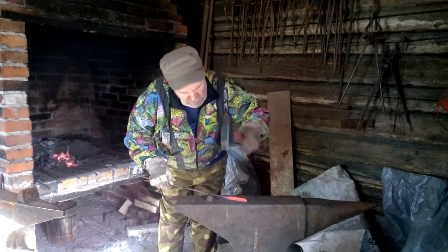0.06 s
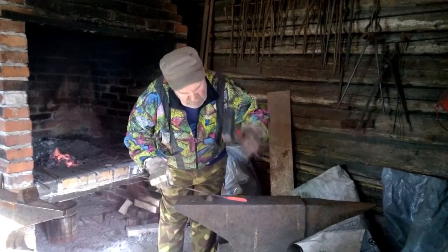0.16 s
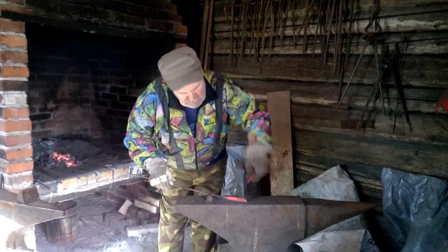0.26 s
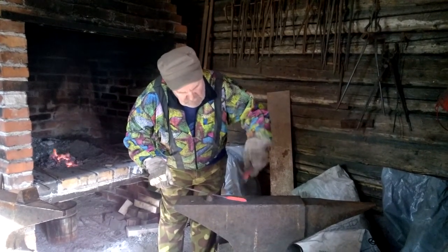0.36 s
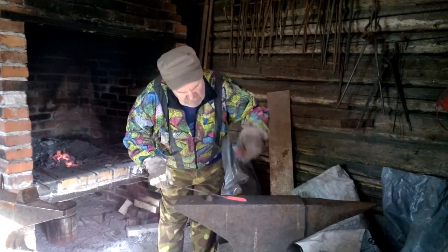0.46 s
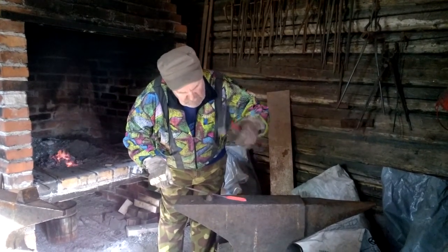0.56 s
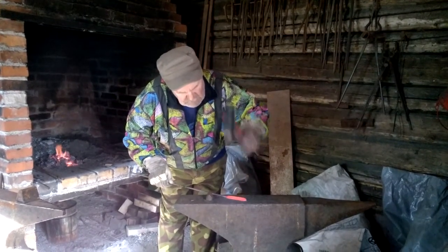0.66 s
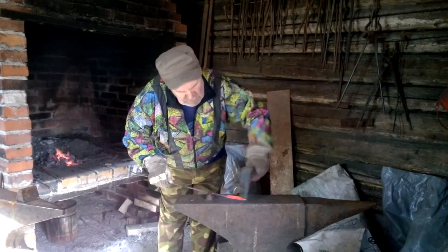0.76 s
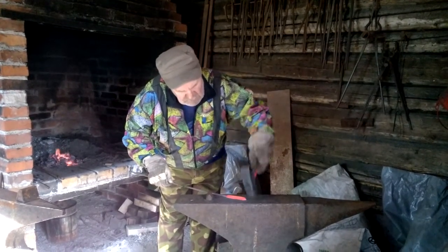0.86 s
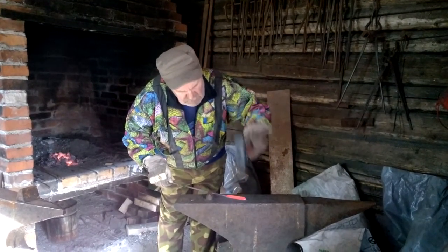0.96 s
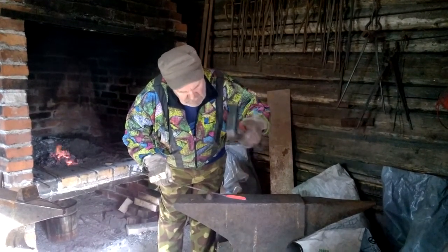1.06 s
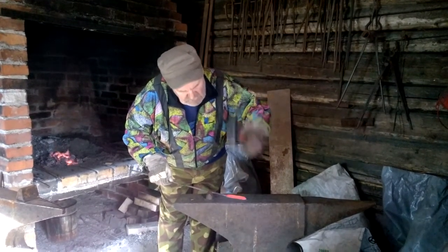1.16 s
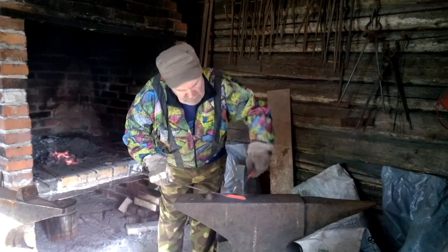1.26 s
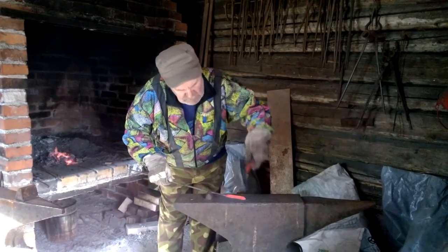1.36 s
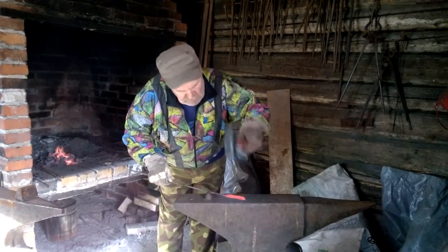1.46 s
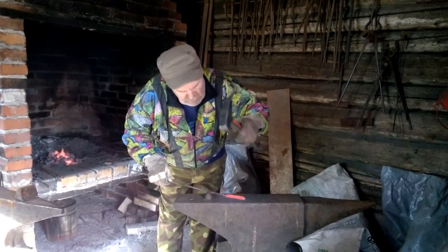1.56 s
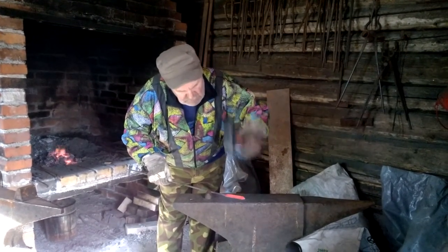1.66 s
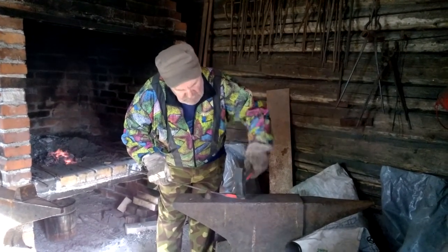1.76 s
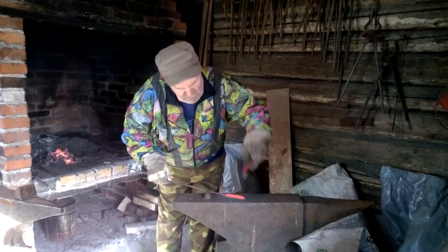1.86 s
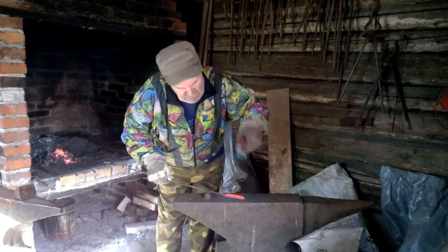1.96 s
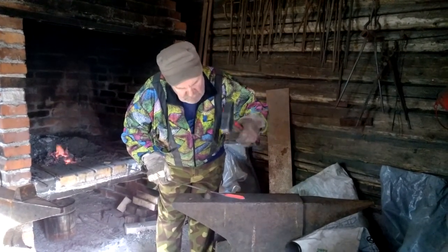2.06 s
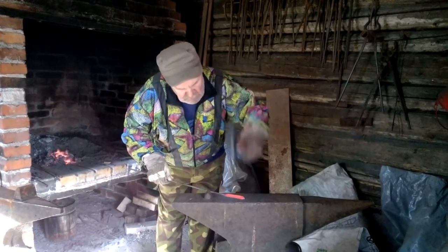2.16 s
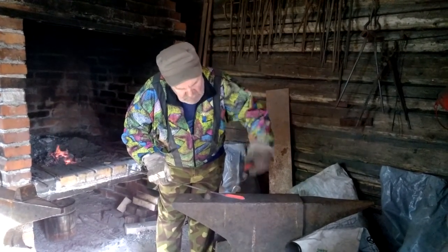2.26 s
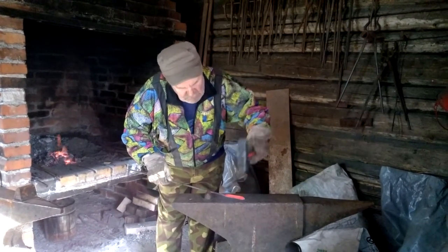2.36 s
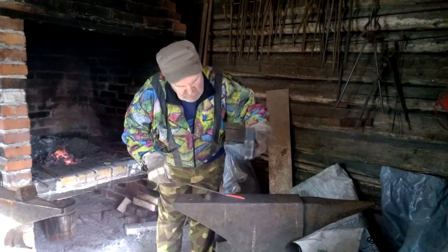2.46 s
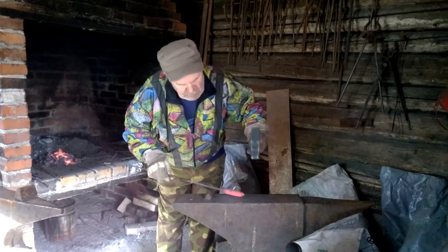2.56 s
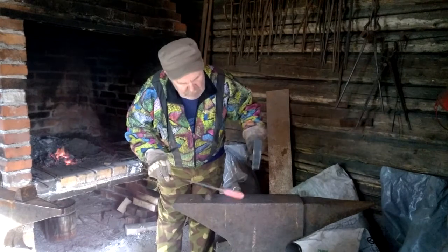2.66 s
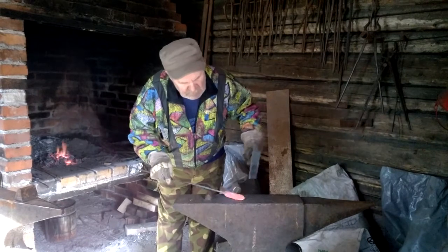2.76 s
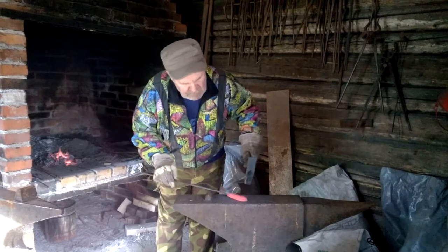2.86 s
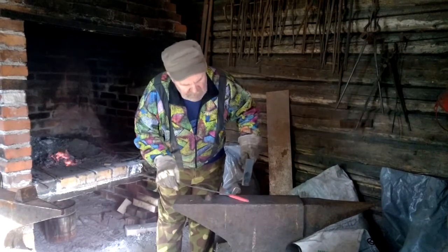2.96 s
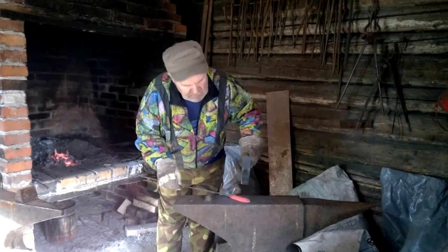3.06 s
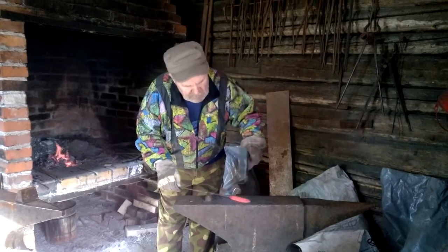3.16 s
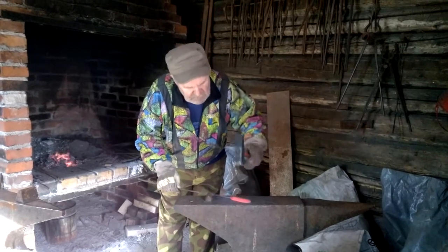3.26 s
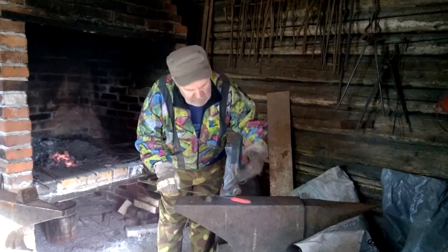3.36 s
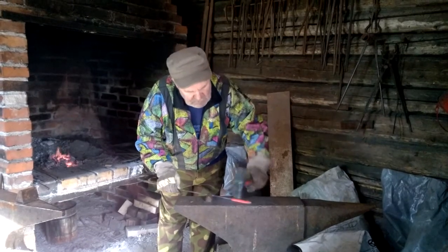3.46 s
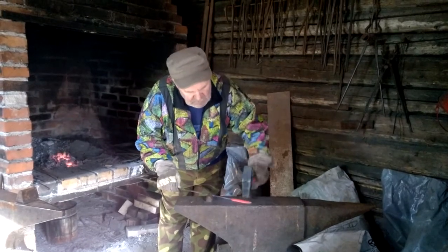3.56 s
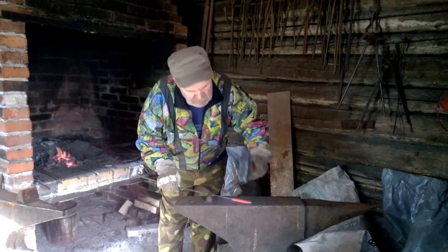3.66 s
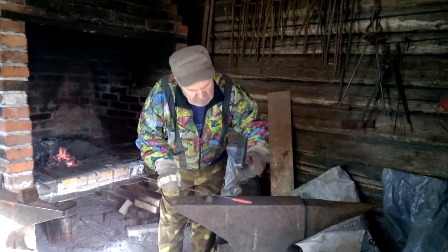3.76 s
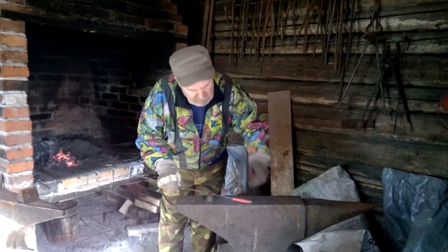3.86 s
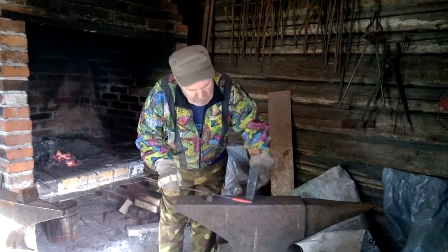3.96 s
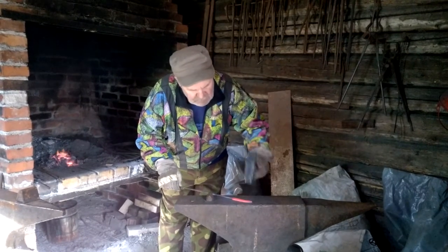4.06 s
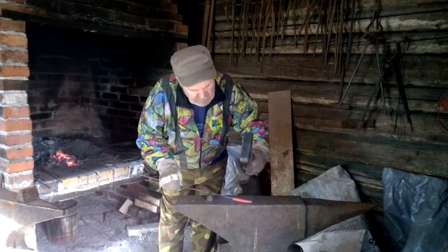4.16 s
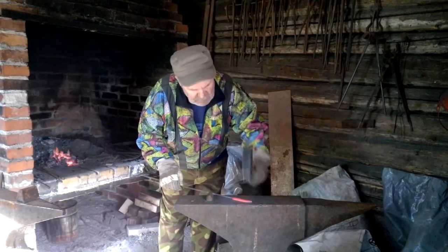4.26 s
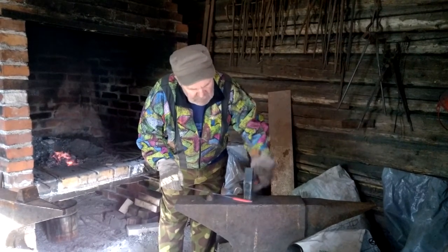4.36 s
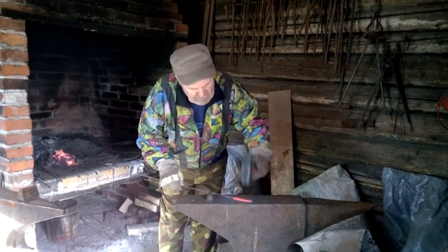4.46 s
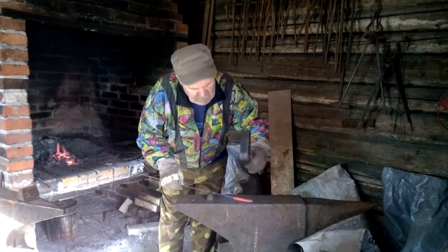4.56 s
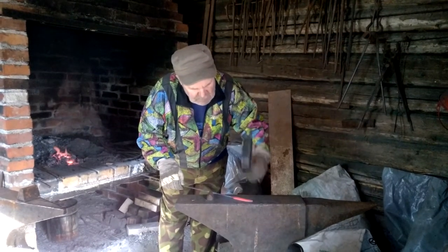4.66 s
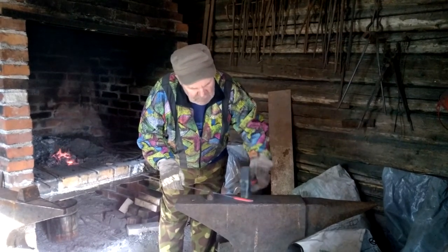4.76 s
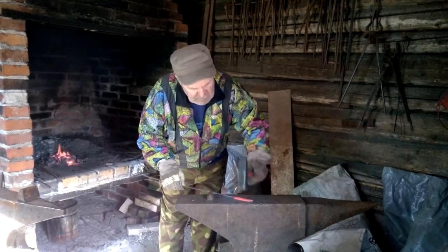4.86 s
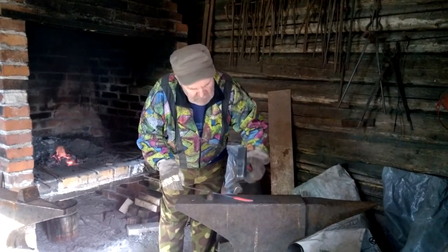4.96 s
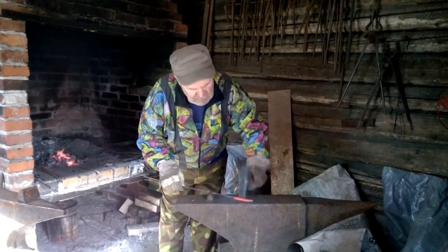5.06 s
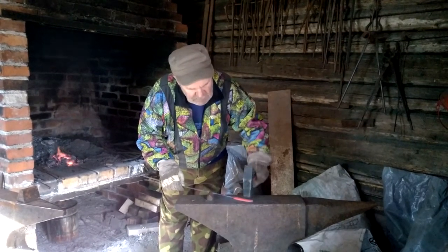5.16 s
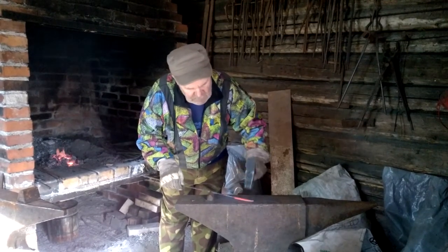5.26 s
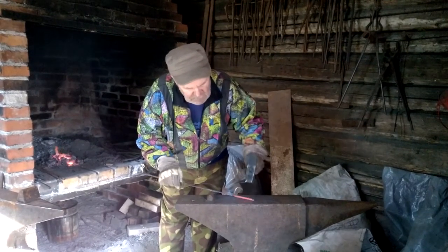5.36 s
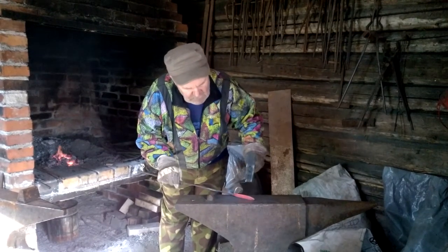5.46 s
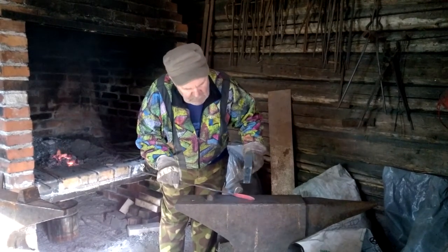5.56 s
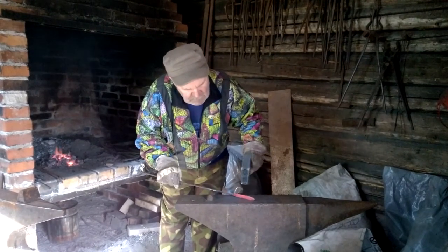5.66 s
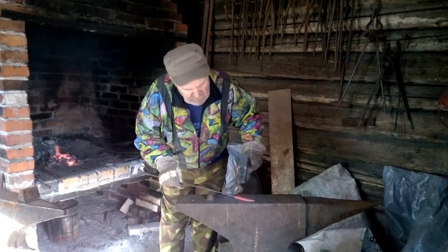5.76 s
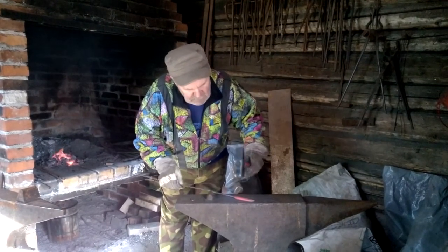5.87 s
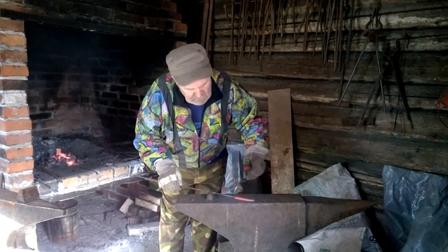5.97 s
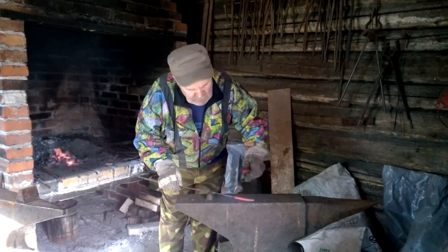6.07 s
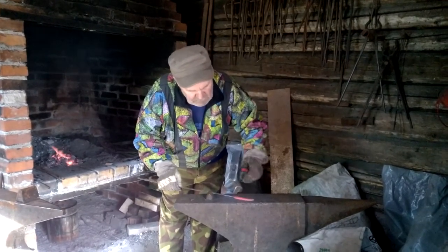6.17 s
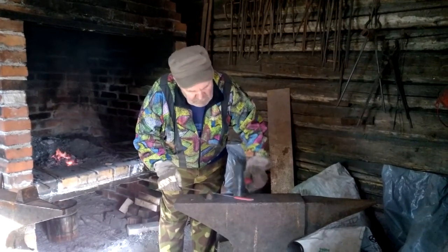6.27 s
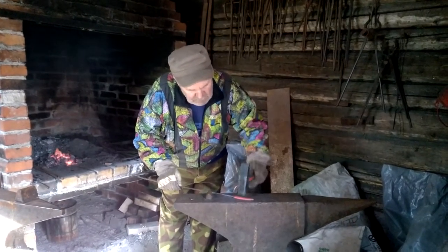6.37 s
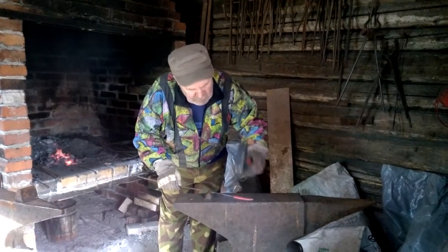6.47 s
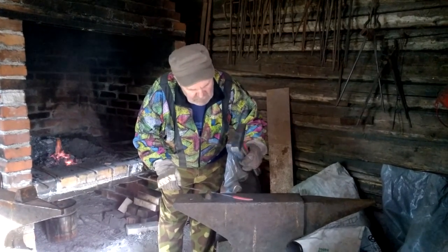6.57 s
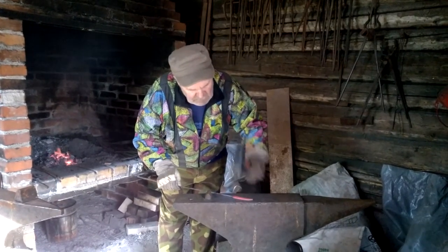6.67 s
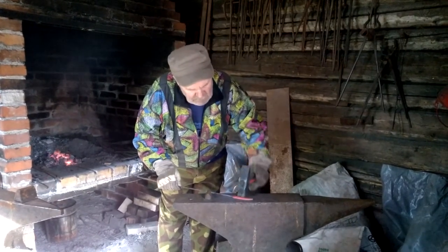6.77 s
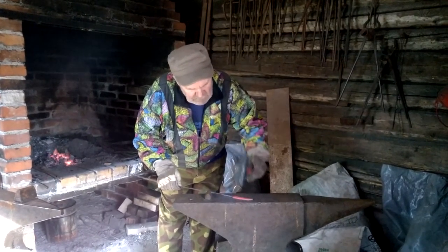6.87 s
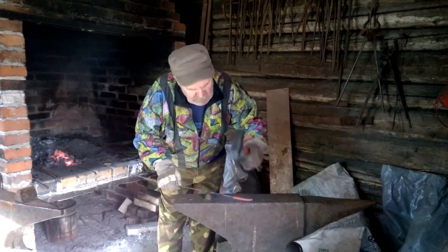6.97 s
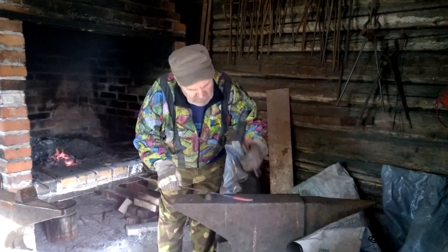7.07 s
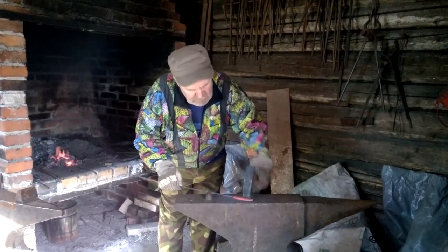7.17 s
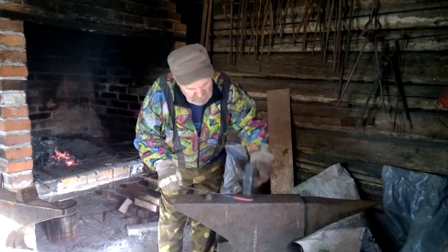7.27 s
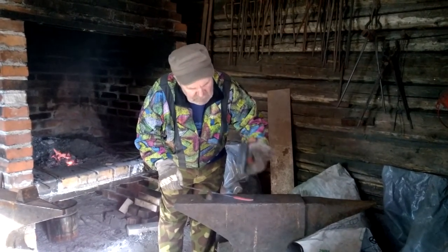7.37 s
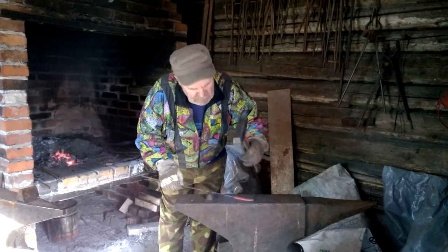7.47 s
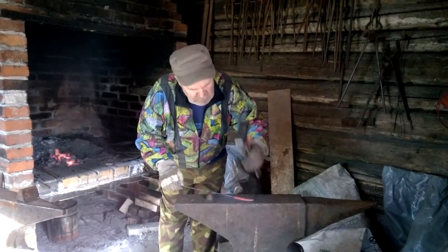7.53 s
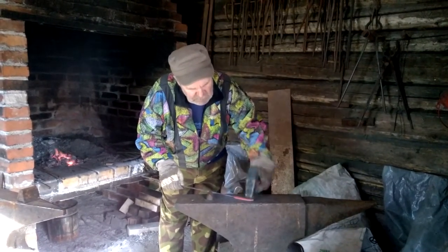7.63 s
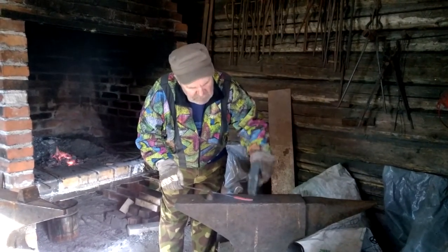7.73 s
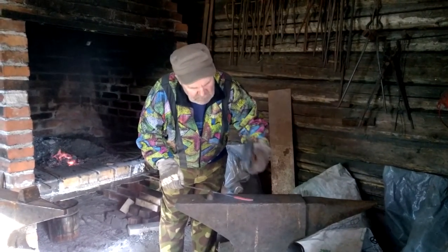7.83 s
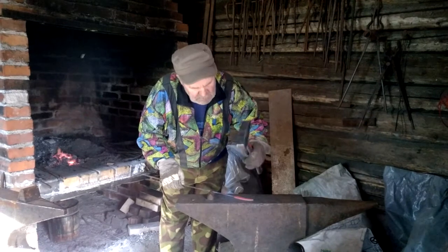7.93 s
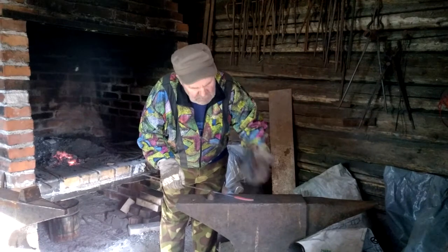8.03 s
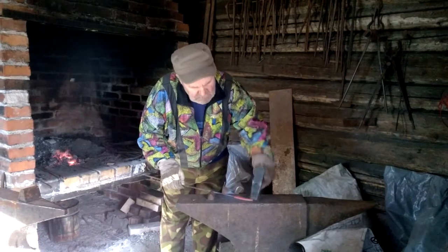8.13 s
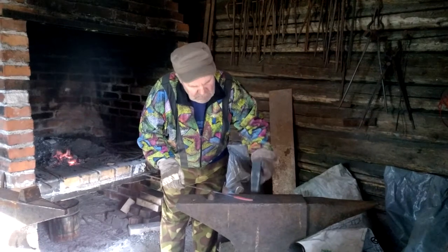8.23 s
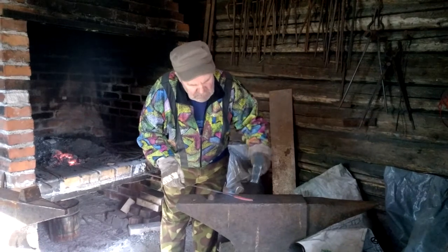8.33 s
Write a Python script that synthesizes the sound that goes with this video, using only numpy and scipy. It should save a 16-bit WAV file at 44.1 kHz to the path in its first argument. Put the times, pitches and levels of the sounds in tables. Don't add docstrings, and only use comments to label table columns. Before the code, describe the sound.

Hard, cracking hammer blows ring a steel anvil about twice a second, with short pauses of taps and rustling over a faint hearth.

```python
import sys
import numpy as np
from scipy import signal
from scipy.io import wavfile
from scipy.ndimage import uniform_filter1d

SR = 44100
rng = np.random.default_rng(int(sys.argv[2]) if len(sys.argv) > 2 else 0)


def wav_out(sig):
    wavfile.write(sys.argv[1], SR, np.round(np.clip(np.atleast_2d(sig).T, -1, 1) * 32767).astype(np.int16))


def convert_level_to_amplitude(level_db):
    exponent = np.asarray(level_db, float) / 20
    return 10 ** exponent


N = 370440


def read(points, hz):
    f, value = np.transpose(points)
    return np.interp(np.log(hz + 1), np.log(f + 1), value)


def evened(x):
    return x / np.sqrt(np.mean(x ** 2) + 1e-20)


def add(mix, s, sound):
    at = round(s * SR)
    sound = sound[..., max(-at, 0):]
    part = mix[:, max(at, 0):][:, :sound.shape[-1]]
    part += sound[..., :part.shape[1]]


# f/Hz, left-right likeness [0..1]
LIKENESS = [(60, 0.92), (250, 1), (600, 0.52), (1650, 0.62), (5000, 0.072), (15000, 0.033)]


def noise(gain, count, size):
    hz = np.fft.rfftfreq(size, 1 / SR)[:, None]
    t = np.arange(count * 4 // size + 3) * size / 4 / SR
    a, b, c, d = rng.standard_normal((len(t), len(hz), 4)).T
    same = np.clip(read(LIKENESS, hz), 0, 1)
    left = a + 1j * b
    right = same * left + np.sqrt(1 - same ** 2) * (c + 1j * d)
    z = np.array([left, right]) * gain(hz, t)
    return signal.istft(z, nperseg=size, noverlap=size * 3 // 4)[1][:, :count]


# f/Hz, level/dB per Hz
HEARTH_TONE = [(15, -20), (25, -2.5), (70, -4), (110, -13.5), (200, -16.5), (500, -27.5), (1000, -32),
               (2000, -39.5), (4000, -44), (8000, -51.5), (12000, -51), (14500, -69)]
HEARTH_DB, PATCHY_DB = -55, 2.5


def hearth():
    def gain(hz, t):
        patches = uniform_filter1d(rng.standard_normal((len(hz), len(t))), 8, 0)
        patches = evened(uniform_filter1d(patches, 10, 1))
        return convert_level_to_amplitude(read(HEARTH_TONE, hz) + PATCHY_DB * patches / (1 + hz / 3000))
    return convert_level_to_amplitude(HEARTH_DB) * evened(noise(gain, N, size=1024))


def swell(s, db, lo_hz, hi_hz):
    t = np.arange(s[0], s[-1], 1 / SR)

    def gain(hz, u):
        low_cut = (hz / lo_hz) ** 2 / (1 + (hz / lo_hz) ** 2)
        return low_cut / (1 + (hz / hi_hz) ** 3) + 0 * u
    band = evened(noise(gain, len(t), size=1024))
    return s[0], band * convert_level_to_amplitude(np.interp(t, s, db)) * signal.windows.tukey(len(t), .15)


# t/s, length [s], level/dB at the end
RUSTLES = [
    (3.5, .165, -75),
    (3.67, .24, -63),
    (3.915, .045, -81),
]
RUSTLE_GROW_DB = 6


def rustle(mix):
    for s, length, db in RUSTLES:
        add(mix, *swell([s, s + length], [db - RUSTLE_GROW_DB, db], 292, 1370))


# t/s, level/dB
STAND_KNOCKS = [
    (1.958, -17),
    (2.09, -31.5),
    (2.21, -44.5),
]
KNOCK_RISE_S, KNOCK_FALL_S, KNOCK_RISE_DB, KNOCK_FALL_DB = 0.053, 0.18, 31, 17.5
RATTLE_S, RATTLE_DB = 2.064, -41
RATTLE_RISE_S, RATTLE_FALL_S, RATTLE_RISE_DB, RATTLE_FALL_DB = .15, .11, -0.5, 26
# level/dB, half width [s]
PUSH = (-13, 0.0016)
PUSH_S = 1.959


def bump(mix):
    out = np.zeros_like(mix)
    for s, db in STAND_KNOCKS:
        times = s + np.array([-KNOCK_RISE_S, 0, KNOCK_FALL_S])
        levels = db - np.array([KNOCK_RISE_DB, 0, KNOCK_FALL_DB])
        add(out, *swell(times, levels, 29, 90))
    times = RATTLE_S + np.array([-RATTLE_RISE_S, 0, RATTLE_FALL_S])
    levels = RATTLE_DB - np.array([RATTLE_RISE_DB, 0, RATTLE_FALL_DB])
    add(out, *swell(times, levels, 200, 650))
    push_db, half_s = PUSH
    u = (np.arange(N) / SR - PUSH_S) / half_s
    return out - convert_level_to_amplitude(push_db) * (1 - 0.53 * u ** 2) * np.exp(-u ** 2 / 2)


def clack(modes):
    t = np.arange(SR // 5) / SR
    return sum(convert_level_to_amplitude(db - 60 * t / t60) * np.sin(2 * np.pi * hz * t) for hz, db, t60 in modes)


# t/s, level/dB, lows over it [dB], sizzle over it [dB]
LIGHT_TAPS = [
    (3.187, -41.5, -31, -11),
    (3.396, -69, -14.5, -8),
    (3.601, -78.5, 1, 3),
    (6.243, -76, -4.5, 7),
    (6.572, -84, -2.5, 5.5),
    (8.387, -76, 16, -4.5),
]
# f/Hz, level/dB, t60 [s]
TINK_MODES = [(5170, -34.5, 0.039), (6560, -38, .05), (2880, -51.5, 0.32), (9200, -49.5, .09)]
TAP_CRACK_DB = 3


def taps(mix, swarm_hz):
    add(mix, LIGHT_TAPS[0][0], clack(TINK_MODES))
    for s, db, low_db, top_db in LIGHT_TAPS:
        add(mix, s, strike(swarm_hz, db + TAP_CRACK_DB, db + low_db, db + low_db, db, db + top_db))


# f/Hz, t60 [s]
ROOM_T60 = [(40, .42), (110, .38), (400, 0.28), (1000, 0.28), (3000, 0.22), (7000, .17), (12000, 0.17),
            (16000, .1)]
HOLD_S = 0.022


def room_fade_db(t, hz):
    return -60 / read(ROOM_T60, hz) * (np.sqrt(t ** 2 + HOLD_S ** 2) - HOLD_S)


# f/Hz, time to answer [s]
ROOM_RISE = [(60, 0.014), (300, 0.017), (2000, 0.002), (12000, 0.0016)]


def room_rise(t, hz):
    return 1 - np.exp(-t / read(ROOM_RISE, hz))


# f/Hz, level/dB
ROOM_COLOUR = [(30, -21), (75, 0), (180, -3), (330, -2), (550, -2), (1100, 1), (1700, 6), (2400, -2),
               (3500, -2), (6500, -1), (8800, -0.5), (12000, -1.5), (14500, -6), (16500, -20)]


def answer_db(per_hz, hz):
    return read(per_hz, hz) + read(ROOM_COLOUR, hz)


# from [f/Hz], centre [f/Hz], to [f/Hz], frame size [samples]
ROOM_BANDS = [
    (0, 100, 200, 1024),
    (200, 500, 1200, 512),
    (1200, 5000, 23000, 256),
]


def room_answer(per_hz, count):
    t = np.arange(count) / SR
    ripple = list(zip(np.arange(1200, 17000, 340), 4.6 * rng.standard_normal(47)))
    out = 0
    for lo, mid_hz, hi, size in ROOM_BANDS:
        def gain(hz, u):
            db = answer_db(per_hz, hz) + read(ripple, hz) * (hz > 3000)
            db = db - 7.2 * (hz > 3800) + 26.5 + room_fade_db(u, hz)
            return convert_level_to_amplitude(db) * (hz >= lo) * (hz < hi)
        out = out + noise(gain, count, size=size) * room_rise(t, mid_hz)
    return out


SWARM_COUNT, SWARM_DB, SWARM_SPREAD_DB = 80, 13.5, 2.5


def swarm(modes_hz, per_hz):
    t = np.arange(SR // 5) / SR
    db = answer_db(per_hz, modes_hz) + 10 + SWARM_DB + SWARM_SPREAD_DB * rng.standard_normal(modes_hz.shape)
    wave = convert_level_to_amplitude(db + room_fade_db(t, modes_hz)) * np.exp(2j * np.pi * modes_hz * t)
    sides = np.exp(2j * np.pi * rng.random((2, len(modes_hz))))
    return (sides @ wave).imag * (1 - np.exp(-t / .005)) * (1 - (t / t[-1]) ** 4)


STUMP_F = [75, 108, 305, 363, 721, 815]
# level/dB over the answer, t60 [s]
STUMP_MODES = [(0, 0.35), (-5, 0.3), (5, .26), (-1.5, 0.29), (-6, 0.34), (-5.5, .27)]


def stump(bands, count):
    t = np.arange(count) / SR
    out = 0
    for hz, (db, t60) in zip(STUMP_F, STUMP_MODES):
        level_db = read(bands, hz) + db
        out = out + convert_level_to_amplitude(level_db - 60 * t / t60) * np.sin(2 * np.pi * hz * t) * room_rise(t, hz)
    return out


# f/Hz, level/dB, t60 [s]
HAMMER_MODES = [(1530, 0, 0.0073), (3570, -8, 0.0019), (4970, 0.5, 0.0024), (6280, -4.5, 0.0057),
                (8900, -4, 0.0085), (10140, -7, 0.0096), (13500, -9, 0.0054)]


def hammer_crack(crack_db, per_hz):
    t = np.arange(900) / SR
    hz, db, t60 = np.transpose(HAMMER_MODES)[:, :, None]
    hz = hz * rng.uniform(.94, 1.06, hz.shape)
    db = db + 0.84 * (read(per_hz, hz) - read(per_hz, 3500))
    crack = convert_level_to_amplitude(db - 60 * t / t60) * np.sin(2 * np.pi * (hz * t + rng.random(hz.shape)))
    return convert_level_to_amplitude(crack_db + 1.5) * crack.sum(0) * (1 - np.exp(-t / 0.0001)) ** 2


STRIKE_BANDS = [110, 550, 5000, 12000]


def strike(swarm_hz, crack_db, *band_db):
    count = round(.4 * SR)
    width_hz = np.array([140, 950, 5000, 6500])
    per_hz = list(zip(STRIKE_BANDS, np.array(band_db) - 10 * np.log10(width_hz)))
    out = room_answer(per_hz, count)
    add(out, 0, swarm(swarm_hz, per_hz))
    out += stump(list(zip(STRIKE_BANDS, band_db)), count)
    add(out, 0, hammer_crack(crack_db, per_hz))
    return out


SNAP_DB, SNAP_S = -12, .0012


def snap(crack_db):
    t = np.arange(SR // 100) / SR
    burst = np.convolve(rng.standard_normal(len(t) + 2), [1, 0, -1], "valid")
    return convert_level_to_amplitude(crack_db + SNAP_DB) * burst * t / SNAP_S * np.exp(-t / SNAP_S)


MID_HEAT_S = 4.2


def follow(law, drift, s, controls):
    return np.array(law) @ np.r_[1, controls] + np.array(drift) * (s - MID_HEAT_S)


FILL_S = 0.0052
DIRECT_SHARE, SETTLE_S = 0.17, .07


def ring(families_hz, families, family_db, scatter=1):
    hz = np.concatenate(families_hz)[:, None]
    db, t60, pan_db, lead = np.concatenate(families).T[:, :, None]
    db = db + np.repeat(family_db, [len(f) for f in families])[:, None]
    t = np.arange(round(1.3 * t60.max() * SR)) / SR
    wave = scatter * convert_level_to_amplitude(db - 60 * t / t60) * np.exp(2j * np.pi * hz * t)
    spread = 1 - DIRECT_SHARE * np.exp(-t / SETTLE_S)
    lead = lead * np.where(abs(lead) < np.pi / 2, spread, 1)
    sides = [(wave * convert_level_to_amplitude(side * pan_db * spread) * np.exp(1j * side * lead)).imag.sum(0) for side in (.5, -.5)]
    return np.array(sides) * (1 - np.exp(-t / FILL_S))


LOW_F = [
    [1421.6],
    [1541.8, 1505],
    [2049.7, 2062.3],
    [2756.7],
    [1631.2],
]
# level/dB in the family, t60 [s], L-R [dB], left lead [rad]; past pi it starts inverted
LOW_MODES = [
    [(-1.5, 0.71, 6, -.1)],
    [(0, 0.96, -2.9, -.9), (-34, 0.7, 0.4, 0.39)],
    [(6.5, 0.18, 1, 2.1), (2, 0.39, 3, 3.5)],
    [(0.5, 0.44, -13.5, 0.23)],
    [(0, .65, -6.5, -1.2)],
]
# typical level/dB, then dB per dB of strength, horn, edge, hardness
LOW_LAW = [
    (-15, 0.93, 1, 0, 0.00065),
    (-9.5, 1, 0.01, -0.24, 0),
    (-15, 0.78, .06, .09, 0.098),
    (-22.5, 0.95, 1, 0.89, 0.071),
    (-27.5, 1, 0.57, -0.64, 0.16),
]
LOW_DRIFT = [-0.035, 0.052, -.4, .01, .2]
PAIR_NULL_S = .085


def low_ring(s, controls):
    low_hz, high_hz = LOW_F[2]
    turn = .5 - (high_hz - low_hz) * PAIR_NULL_S
    start = np.where(np.concatenate(LOW_F) == high_hz, np.exp(2j * np.pi * turn), 1)[:, None]
    return ring(LOW_F, LOW_MODES, follow(LOW_LAW, LOW_DRIFT, s, controls), start)


UPPER_F = [
    [3171.6, 3593, 3603, 4086, 4225],
    [5341],
    [5374, 5464],
    [6541, 7280, 8043, 8614, 9230, 10320, 13018],
    [11142, 11920],
]
# level/dB in the family, t60 [s], L-R [dB], left lead [rad]
UPPER_SET = [
    [(-7, 0.21, -2, 2.5), (-5.5, 0.21, -2, 1.04), (-8, 0.11, 1, 3), (-14, 0.19, 3, -0.35),
     (-10.5, 0.23, 1.95, 1.5)],
    [(0.0036, 0.26, -7.5, .2)],
    [(-1, 0.23, -6, 0.54), (-12.5, 0.16, 1, .3)],
    [(-9.5, .2, 2, 0), (-1, 0.21, -1.45, 4.5), (-7, 0.18, 3.5, -5.5), (1.5, 0.23, 1.5, 1), (6, .14, 7, 3),
     (-6.5, 0.19, -4.5, 2.9), (-2.5, 0.08, 0.1, 0.15)],
    [(-3, 0.16, -6.5, .4), (-12.5, 0.073, .1, 0.37)],
]
# typical level/dB, then dB per dB of strength, horn, edge, hardness
UPPER_FOLLOW = [
    (-22.5, 0.9, -0.21, .34, 0.18),
    (-40, 0.24, -0.16, 0.73, .25),
    (-28.5, 1.1, -0.058, 0.27, .3),
    (-37, 1.14, -0.0099, -0.1, -0.0036),
    (-26.5, .03, .03, -0.034, 1),
]
UPPER_FADE = [-0.76, -1.5, .3, -0.14, .05]
SCATTER_DB = 2.5


def upper_ring(s, controls):
    scatter = convert_level_to_amplitude(SCATTER_DB * rng.standard_normal((sum(map(len, UPPER_F)), 1)))
    return convert_level_to_amplitude(7.0) * ring(UPPER_F, UPPER_SET, follow(UPPER_FOLLOW, UPPER_FADE, s, controls), scatter)


# typical level/dB, then dB per dB of strength, horn, edge, hardness
CONTACT_LAW = [
    (-5, 0.3, -0.11, -0.021, 0.05),
    (-27.5, 0.11, -0.04, -0.16, 0.0068),
    (-20.5, 0.28, -0.1, .02, .02),
    (-20, 0.7, 0.048, 0.16, -.17),
    (-19.5, 0.08, .12, -0.1, -0.013),
]
CONTACT_DRIFT = [-.1, .05, -.05, -.2, .15]
REBOUND_S, DAMP_DB = 4.011, -7


def blow(mix, swarm_hz, s, controls, soft_db=0):
    strike_db = follow(CONTACT_LAW, CONTACT_DRIFT, s, controls) + soft_db
    add(mix, s - .001, strike(swarm_hz, *strike_db))
    add(mix, s - .0006, snap(strike_db[0]))
    for bell in (low_ring(s, controls), upper_ring(s, controls)):
        since = s + np.arange(bell.shape[1]) / SR - REBOUND_S
        choke_db = DAMP_DB * np.clip(since / 0.0056, 0, 1) * (s < REBOUND_S)
        add(mix, s - .0005, bell * convert_level_to_amplitude(choke_db))


# strength, toward horn, toward edge, hardness [level/dB]
TOUCH = (-11.5, -8, -14, -26.5)
TOUCH_SOFT = (-5.5, -12, -11.5, -10, -46)
# f/Hz, level/dB, t60 [s]
FACE_MODES = [(2120, -15, 0.029)]


def rebound(mix, swarm_hz):
    blow(mix, swarm_hz, REBOUND_S, TOUCH, np.array(TOUCH_SOFT))
    add(mix, REBOUND_S - .001, clack(FACE_MODES))


# t/s, strength [level/dB], toward horn [dB], toward edge [dB], hardness [dB]
HAMMER_BLOWS = [(-.204, -1, -1.4, 4, -2), (.285, 1, -9.5, -6.2, -5), (0.774, 4.5, -15.5, -9.5, 8),
                (1.259, 6.5, -3, 3.5, 7.5), (1.743, 7, -4, 2, 10.5), (2.238, 4.5, 0.16, 1.2, -6),
                (2.726, 8.5, -8.5, 2.6, -2.5), (3.96, -18, 6, 10, -12), (4.399, -10, 5, -7.5, -16.5),
                (4.817, 1.5, 5, -5.5, 5), (5.236, 1.5, 7.5, -1.1, 6.5), (5.574, -2.44, -1, 7.5, -3.5),
                (6.772, -18, 9, 6, -5), (7.214, 1.84, 5, 1.7, 7.5), (7.675, 5, 7, -2.8, 3.5),
                (8.13, 5.5, 4.6, -0.8, 9.5)]


def hammering(mix, swarm_hz):
    for s, *controls in HAMMER_BLOWS:
        blow(mix, swarm_hz, s, controls)


def scene():
    mix = hearth()
    swarm_hz = rng.uniform(2300, 15500, (SWARM_COUNT, 1))
    rustle(mix)
    taps(mix, swarm_hz)
    rebound(mix, swarm_hz)
    hammering(mix, swarm_hz)
    return mix + bump(mix)


def top_cut(x):
    return signal.sosfilt(signal.butter(12, 17000, fs=SR, output="sos"), x)


def record(dry):
    lag = np.exp(-1 / (0.0012 * SR))
    power = signal.lfilter([1 - lag], [1, -lag], (dry ** 2).mean(0))
    power_db = 10 * np.log10(power + 1e-12)
    fall = np.arange(N) * 290.0 / SR
    over_db = np.maximum(np.maximum.accumulate(power_db + fall) - fall + 8.5, 0)
    held = np.tanh(dry / convert_level_to_amplitude(0.69 * over_db) / 1.258) * 1.12
    cut = signal.sosfilt(signal.butter(2, 32, "high", fs=SR, output="sos"), held)
    low = signal.oaconvolve(cut, signal.firwin(255, 16200, fs=SR)[None], "same")
    finished = np.clip(low, -1, 1)
    return top_cut(finished)


dry = scene()
out = record(dry)
wav_out(out)
```